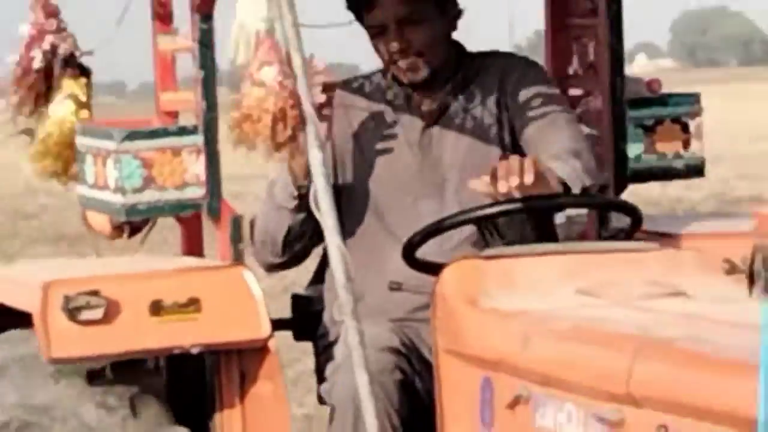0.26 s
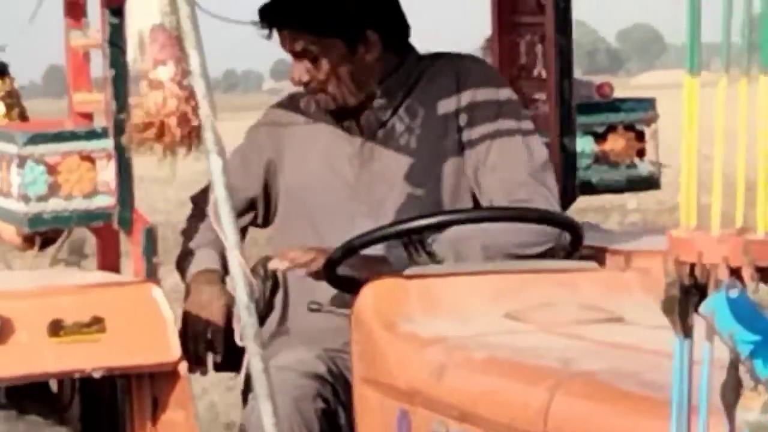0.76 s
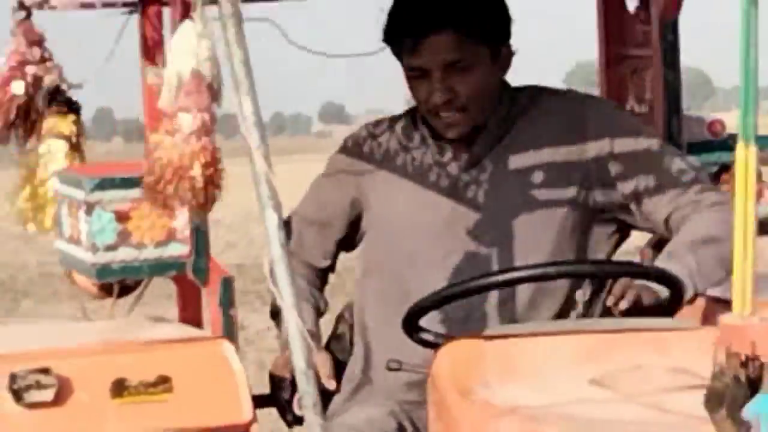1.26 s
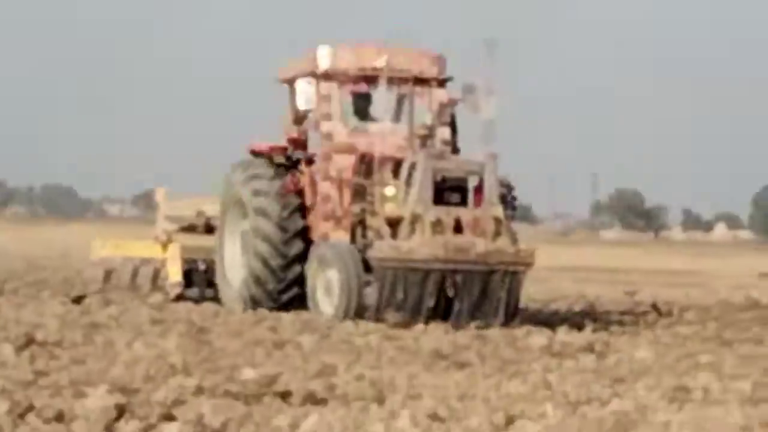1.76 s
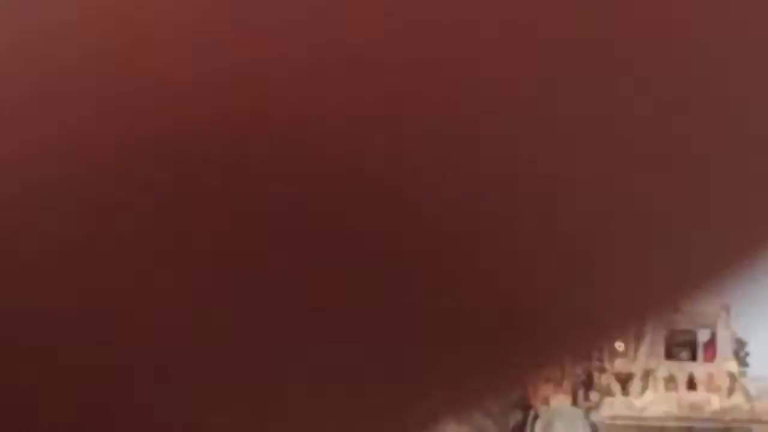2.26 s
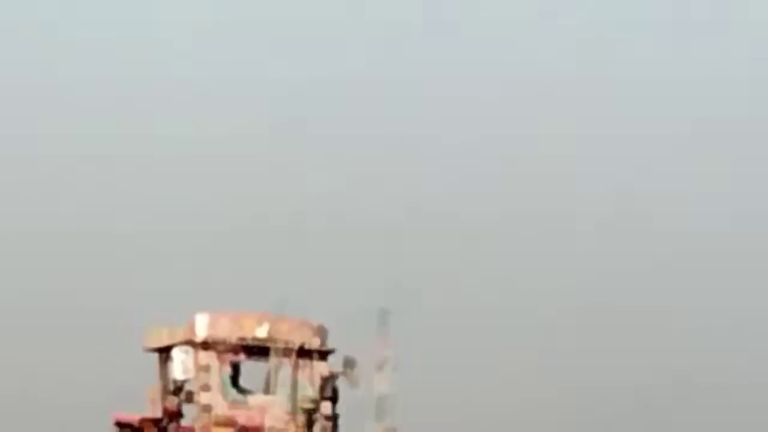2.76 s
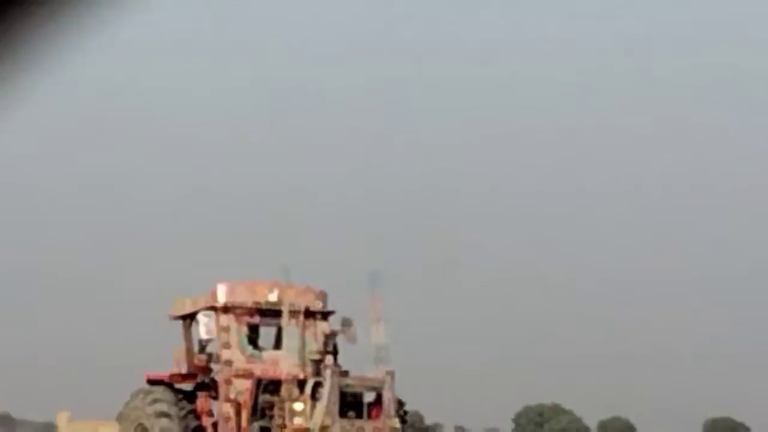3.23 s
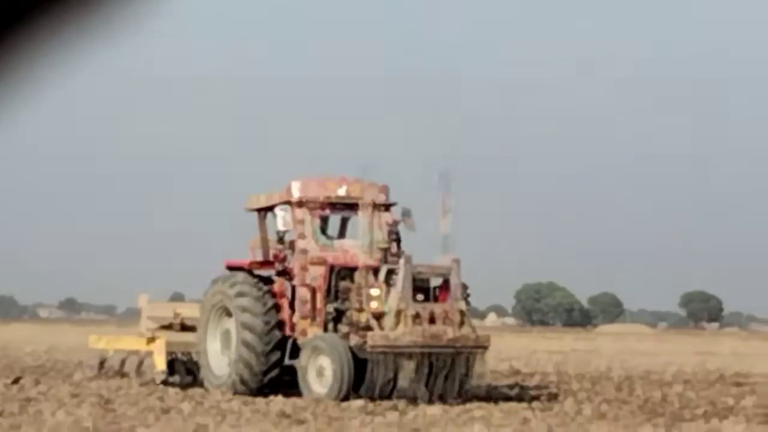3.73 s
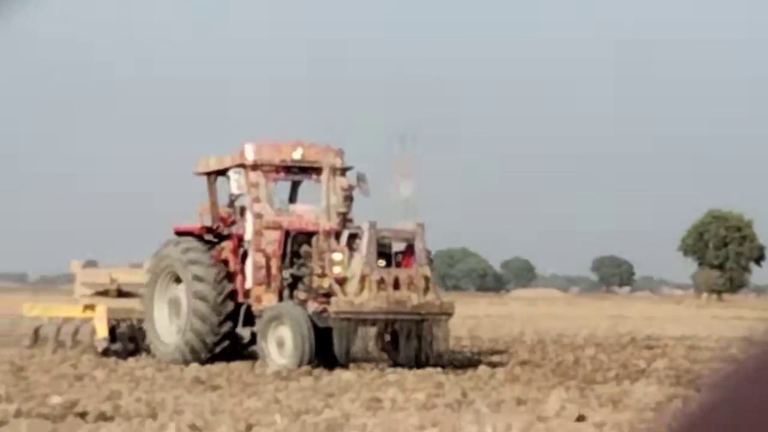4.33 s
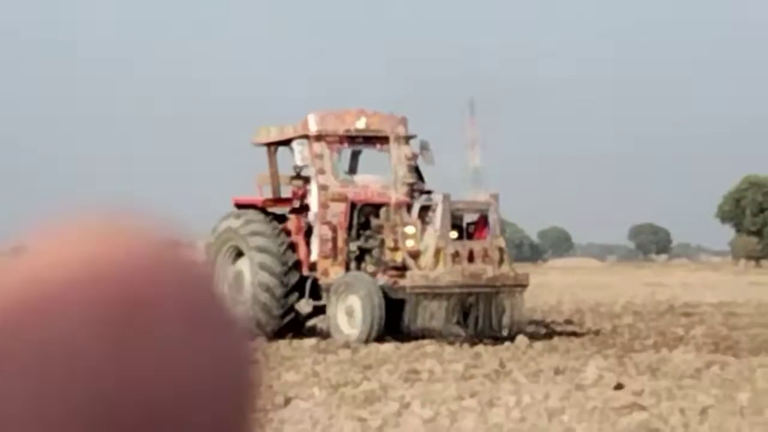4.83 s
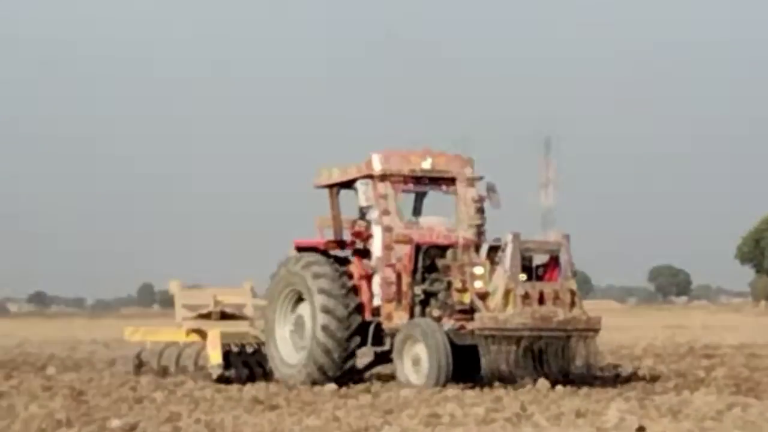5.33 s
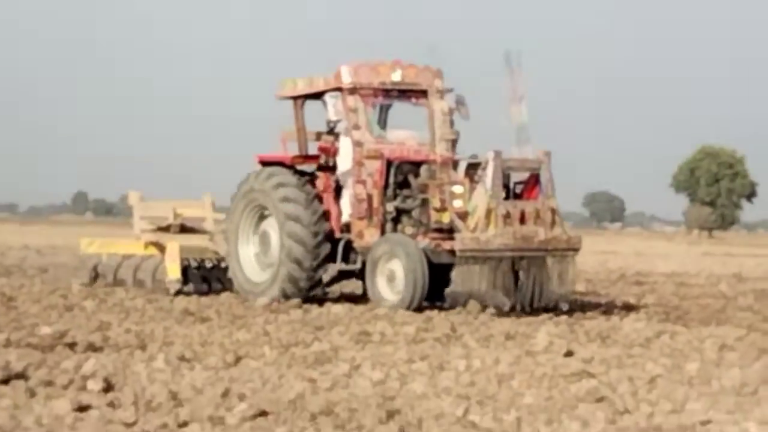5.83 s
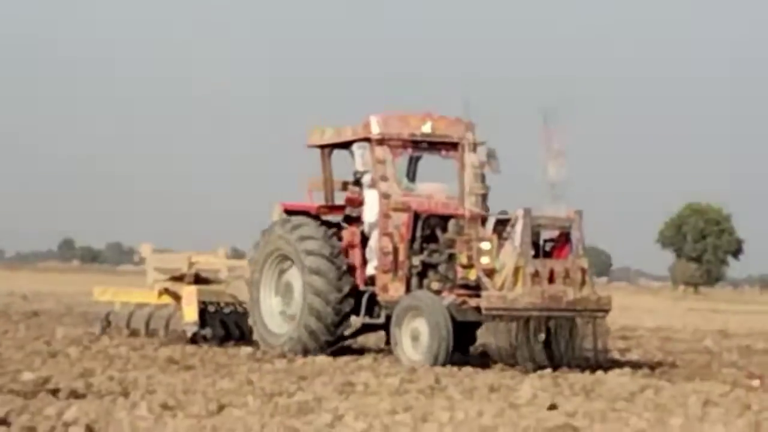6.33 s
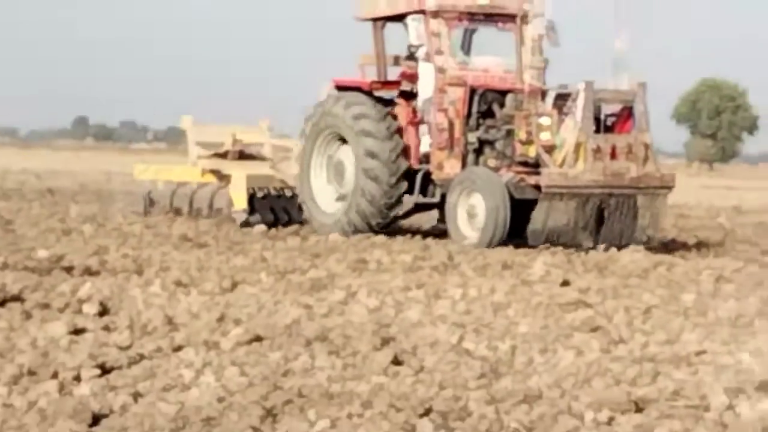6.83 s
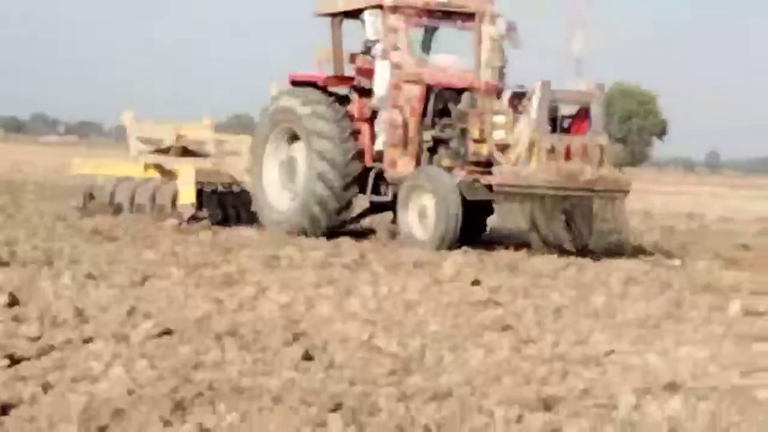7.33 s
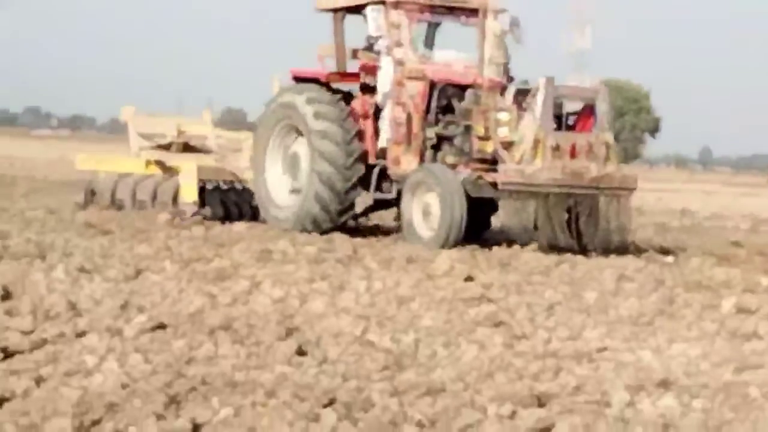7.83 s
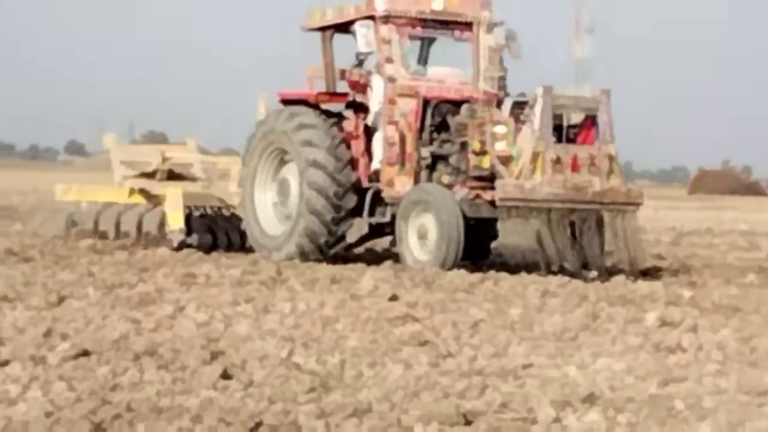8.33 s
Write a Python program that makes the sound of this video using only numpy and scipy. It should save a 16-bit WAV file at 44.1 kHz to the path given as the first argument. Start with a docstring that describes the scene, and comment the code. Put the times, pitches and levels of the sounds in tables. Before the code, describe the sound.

Very close to an old three-cylinder diesel tractor in an open field, rapid hard knocks and low exhaust thuds grow louder, with boom, ringing metal and steel scraping. Abruptly the view jumps far away: a quieter, steady low throb under blurred clatter, faint soil crumble and tiny squeaks. A finger briefly dulls the treble of the handheld microphone; later a panel buzzes, stones tick, and light wind gusts with soft bumps.

```python
"""A three-cylinder diesel tractor drags a disc harrow over dry soil. First, beside the cab, each firing thuds as
a pressure pulse in the exhaust and knocks as a noise burst through the block; it grows, rings and scrapes.
All at once it is across the field: a low throb under smeared clatter, crumbling soil and squeaks of swelling
sine. A finger dulls the treble, two faint tones having sagged before it; later the clatter turns ringing,
stones tick and a panel buzzes. Low-passed noise is the wind throughout, with a gust and bumps near the end."""
import sys
import numpy as np
from scipy import signal
from scipy.fft import rfft, irfft
from scipy.io import wavfile
from scipy.ndimage import uniform_filter1d, map_coordinates

SR = 44100
rng = np.random.default_rng(int(sys.argv[2]) if len(sys.argv) > 2 else 0)


def unload_wav(signal):
    """Save mono or channel-first audio to the path in sys.argv[1] as 16-bit WAV at rate SR, clipped to [-1, 1]."""
    wavfile.write(
        sys.argv[1],
        SR,
        np.round(np.clip(np.atleast_2d(signal).T, -1, 1) * 32767).astype(np.int16),
    )


N = 378378
T = np.arange(N) / SR  # time axis, s

# In every table, "reach" is the time from the middle of a swell to silence on either side.
# Spectra of slopes and modes set colour only: the filtered sound is scaled to rms 1 afterwards.

# Wind on the microphone, its spectrum: [f/Hz, level/dB]
WIND_SLOPE = [(10, -4), (30, 0.5), (70, -0.5), (130, 0), (200, -16.5), (500, -13.5), (2000, -70)]
# Soft bumps of the hand: [t/s, level/dB of the rustle], and the rustle's spectrum: [f/Hz, level/dB]
BUMPS = [(4.253, -44), (8.15, -42), (8.422, -32)]
BUMP_SLOPE = [(20, 32), (110, -12.5), (200, -14), (400, -1), (1500, -62)]
# Faint low tones that slide down: [middle t/s, reach/s, f/Hz at the middle, level/dB]
SAGS = [(2.699, 0.079, 378, -49.5), (2.812, 0.16, 365, -49.5)]
# Squeaks of the discs: [middle t/s, reach/s, f/Hz, level/dB]
SQUEAKS = [(1.59, .03, 6100, -32), (2.03, .045, 6030, -29), (4.96, .025, 15200, -48),
           (4.964, .02, 12500, -50), (5.03, .1, 12630, -51), (5.03, .1, 14770, -54),
           (5.04, .11, 10510, -53), (5.38, .08, 10200, -47), (5.378, .08, 9600, -49),
           (5.595, .035, 14900, -51), (5.97, .025, 8100, -42), (6.275, .025, 12350, -53),
           (7.235, .035, 8280, -44)]
# Clods breaking up on the discs: [middle t/s, reach/s, level/dB], and their spectrum: [f/Hz, level/dB]
SOIL = [(2.45, 0.23, -63), (3.15, .45, -59), (3.6, 0.23, -64), (4.8, 0.19, -54), (5.03, 0.29, -51),
        (5.4, 0.46, -51), (5.9, 0.71, -55.5), (6.28, .16, -53.5), (6.62, 0.5, -63)]
SOIL_SLOPE = [(2000, -31), (7000, -26), (12000, 6.5), (15000, 8)]
# Stones ticking on the discs: [t/s, level/dB], and their spectrum: [f/Hz, level/dB]
STONES = [(6.85, -46), (7.225, -45), (7.823, -42.5)]
STONE_SLOPE = [(3000, -30), (7500, 6), (11000, -2), (15000, -11)]
# Steel scraping through soil close by: [middle t/s, reach/s, level/dB]
SCRAPES = [(1.59, 0.078, -27.5), (1.84, 0.042, -31.5), (2.03, 0.09, -26), (2.23, 0.062, -25.5),
           (2.31, 0.14, -27.5)]
# Colour of the scrapes: slope [f/Hz, level/dB] and resonances [f/Hz, width/Hz, level/dB]
SCRAPE_SLOPE = [(300, -1.5), (1200, 1), (4000, -6), (8500, 1), (11000, -7), (15000, -23)]
SCRAPE_MODES = [(5900, 220, 6.2), (6840, 81, 4.5), (7550, 120, 8.1), (8540, 78, 5)]
# Loudest knocks of the strongest cylinder, their ring: [t/s, f/Hz, level/dB]
LOUDEST_KNOCKS = [(1.273, 2430, -17), (1.403, 2680, -17), (1.726, 2400, -17), (1.853, 2350, -11.5),
                  (1.918, 2400, -18), (1.984, 2320, -18), (2.113, 2350, -16.5), (2.307, 3720, -20),
                  (2.329, 3620, -16)]
# Gear whines: [middle t/s, reach/s, multiple of the firing rate, level/dB]
WHINES = [(3.7, 1.6, 32, -49.5), (6.5, 2.6, 19.5, -52.5)]
# Colour of the buzzing panel: slope [f/Hz, level/dB] and resonances [f/Hz, width/Hz, level/dB]
BUZZ_SLOPE = [(1000, -35), (2000, 9), (2600, 0), (4000, -40)]
BUZZ_MODES = [(2258, 45, 14), (2490, 66, 8.6)]
# Engine speed beside the cab and across the field: [t/s, firing rate/Hz]
NEAR_RATE = [(0.0, 46.53), (0.4, 46.54), (0.81, 47.03), (1.22, 46.18), (1.62, 46.44), (2.03, 46.91),
             (2.43, 45.21)]
FAR_RATE = [(2.98, 44.11), (3.03, 45.71), (3.37, 43.64), (3.99, 46.03), (4.13, 43.49), (4.6, 45.5),
            (5.01, 42.95), (5.47, 45.88), (6.03, 42.92), (6.05, 44.85), (7.05, 43.71), (7.44, 44.77),
            (8.5, 44.4)]
# Strength of each cylinder in turn, in the knock and in the exhaust: [level/dB]
KNOCK_CYLINDERS_DB = [-7, -4.5, -4]
EXHAUST_CYLINDERS_DB = [2, 1, -0.5]
# Spectrum of an exhaust thud, close and far: [f/Hz, level/dB]
NEAR_PIPE = [(10, -30), (25, -18), (46, 2), (93, 2.5), (140, -6.5), (186, -3.5), (232, -8.5), (280, -4.5),
             (350, -21), (420, -10.5), (500, -28.5), (1200, -35.5)]
FAR_PIPE = [(15, -25.5), (45, 5.5), (65, 0.5), (89, 1.5), (134, -21.5), (180, -41.5), (300, -30.5),
            (900, -44)]
# Clatter across the field: [t/s, level/dB]
FAR_CLATTER = [(2.85, -40.5), (2.98, -36.5), (3.6, -35.5), (4.1, -39.5), (4.85, -35), (5.5, -35.5),
               (5.75, -38), (6.3, -38), (6.65, -42), (7.7, -40)]
# Block and panels heard close, from the front and from the flank:
# slopes [f/Hz, level/dB] and resonances [f/Hz, width/Hz, level/dB]
NEAR_SLOPE = [(220, -4.5), (350, -6), (500, -16), (1100, -13), (1900, -12.5), (3200, -14.5), (4500, -17),
              (9000, -23), (12500, -35.5), (15000, -39.5)]
NEAR_MODES = [(392, 32, 6.8), (776, 400, 12.1), (960, 180, 3.8), (1333, 470, 7.5), (2304, 450, 8),
              (3000, 430, 2.9), (3730, 140, 3.4), (5130, 730, 8.7), (5940, 1700, 4.2), (7790, 1700, 8.3),
              (12000, 2600, 8)]
FRONT_SLOPE = [(200, -24), (480, -17), (1100, -10), (2000, -5.5), (3400, -14), (5400, -14.5), (9000, -12.5),
               (11500, -18.5), (15000, -27)]
FRONT_MODES = [(802, 32, 6.3), (1325, 230, 7.1), (1610, 64, 4.2), (2460, 210, 4.2), (2770, 430, 4.4),
               (4230, 2000, 6.1), (6930, 820, 4.9), (7600, 330, 3.5)]
FLANK_SLOPE = [(200, -32), (500, -21), (1100, -21.5), (1850, -19), (3400, -19), (7200, -24.5),
               (11500, -39.5), (15000, -45)]
FLANK_MODES = [(368, 30, 9.7), (707, 40, 4.7), (851, 37, 9.2), (1328, 96, 9.3), (1470, 410, 9.6),
               (2094, 61, 6.9), (2470, 470, 10.4), (5560, 310, 3.6), (6290, 260, 2.4), (8350, 840, 11.6),
               (9400, 580, 12.4), (10600, 680, 15)]

CUT_S = 2.43  # the listening point jumps across the field
TOP_HZ = 15450  # upper limit of the whole sound

# Wind on the microphone freshens slowly, with one gust
WIND_DB, WIND_DB_PER_S = -51.5, 0.35
GUST_S, GUST_REACH_S, GUST_DB = 8.2, 0.4, 3
SAG_HZ_PER_S = 600  # downward slide of the faint tones
TRICKLE_DB = -65.5  # steady trickle of soil under the clods

# A finger creeps over the microphone and is lifted; start and end of each move, and the loss when covered
COVER_S, UNCOVER_S = (3.35, 3.76), (4.33, 4.94)
COVER_KNOCK_DB, COVER_SOIL_DB = -7, -11

# A band of noise made from the knock sweeps upward as the tractor turns
SWEEP_S, SWEEP_REACH_S = 6.45, 1.3
SWEEP_HZ, SWEEP_HZ_PER_S, SWEEP_HALF_WIDTH_HZ, SWEEP_DB = 8160, 1700, 750, -52

# A loose panel starts to buzz and keeps on
BUZZ_START_S, BUZZ_ATTACK_S, BUZZ_DB, BUZZ_WAVER_DB = 7.08, 0.17, -47, 0.5

# Across the field: the throb grows slowly from the jump on, a little unevenly
FAR_EXHAUST_DB, FAR_EXHAUST_DB_PER_S, FAR_WAVER_DB = -37, 0.22, 1.1
SWING_S = (6.1, 6.76)  # start and end of the turn, as the side of the engine comes round
FRONT_TREBLE_DB, FLANK_TREBLE_DB = -7.5, -9.5  # offset of the clatter's treble
TREBLE_FOLLOW, TREBLE_PIVOT_DB = 0.68, -38  # treble takes this share of the level swings about the pivot

# Beside the cab: level at first, and its rise as the tractor draws level
APPROACH_S = (0.55, 1.58)  # start and end of the rise
NEAR_EXHAUST_DB, NEAR_EXHAUST_GAIN_DB = -29, 1.4
NEAR_KNOCK_DB, NEAR_KNOCK_GAIN_DB = -27, 3.5
NEAR_BOOM_DB, NEAR_BOOM_GAIN_DB = -39, 10
NEAR_HUM_HZ, NEAR_HUM_DB = 40.5, -44  # a weaker hum beats against the exhaust
BITE_S, BITE_REACH_S, BITE_DB = 2.21, 0.15, 2  # swell of the clatter as the harrow bites


def undb(db):
    """Decibels to gain."""
    return 10 ** (np.asarray(db) / 20)


def unit(x):
    """Scale to rms 1."""
    return x / np.sqrt(np.mean(x ** 2))


def curve(table):
    """A value over time, its points joined by straight lines."""
    t, value = np.transpose(table)
    return np.interp(T, t, value)


def noise():
    """White noise of rms 1."""
    return rng.standard_normal(N)


def ramp(start_s, end_s):
    """From 0 to 1 between two times."""
    return np.clip((T - start_s) / (end_s - start_s), 0, 1)


def wander(hz):
    """Slow random drift of rms 1, with hz turning points a second at most."""
    knots = np.arange(0, T[-1] + 1, 1 / hz)
    return unit(np.interp(T, knots, noise()[:len(knots)]))


def swell(middle_s, reach_s):
    """A smooth rise and fall, the fourth power of a cosine."""
    shape = np.zeros(N)
    inside = np.abs(T - middle_s) < reach_s
    shape[inside] = np.cos(np.pi / 2 * (T[inside] - middle_s) / reach_s) ** 4
    return shape


def swells(table):
    """Gain of a series of smooth swells."""
    return sum(undb(db) * swell(s, reach) for s, reach, db in table)


def band(x, hz, kind, order=4):
    """Butterworth low-pass or high-pass."""
    return signal.sosfilt(signal.butter(order, hz, kind, fs=SR, output="sos"), x)


def body(x, slope, modes=()):
    """Ring x through a causal, minimum-phase response made of a slope and resonances; rms 1."""
    size = 16384
    f = np.arange(size // 2 + 1) * SR / size
    slope_hz, slope_db = np.transpose(slope)
    db = np.interp(np.log(f + 1), np.log(slope_hz), slope_db)
    db = db + sum(peak / (1 + (2 * (f - hz) / width) ** 2) for hz, width, peak in modes)
    # keeping one side of the cepstrum makes the response causal
    cepstrum = irfft(db * np.log(10) / 20)[:size // 2]
    response = irfft(np.exp(2 * rfft(cepstrum, size)))
    return unit(signal.oaconvolve(x, response)[:N])


def ping(s, hz, decay_s):
    """One mode struck at time s: a dying sine."""
    shape = np.zeros(N)
    inside = (T > s) & (T < s + 10 * decay_s)
    age = T[inside] - s
    shape[inside] = np.sin(2 * np.pi * hz * age) * np.exp(-age / decay_s)
    return shape


def blows(table, slope, decay_s):
    """Short dying bursts of noise through one body, each at its own level."""
    rough = body(noise(), slope)
    return rough * sum(undb(db) * (T > s) * np.exp(-np.abs(T - s) / decay_s) for s, db in table)


def covered():
    """How far the finger shades the microphone, 0 to 1."""
    return ramp(*COVER_S) - ramp(*UNCOVER_S)


def microphone_rumble():
    """Light wind as low noise with one gust; each bump of the hand thumps the case and rustles."""
    wind_db = WIND_DB + WIND_DB_PER_S * T + GUST_DB * swell(GUST_S, GUST_REACH_S)
    wind = body(noise(), WIND_SLOPE) * undb(wind_db)
    # the thump is set 2 dB above the listed rustle level
    thumps = sum(undb(db + 2) * ping(s, hz=116, decay_s=0.012) for s, db in BUMPS)
    rustle = blows(BUMPS, BUMP_SLOPE, decay_s=0.02)
    return wind + thumps + rustle


def sagging_tone():
    """A faint low sine, sounding twice and sliding down each time."""
    out = np.zeros(N)
    for s, reach, hz, db in SAGS:
        cycles = np.cumsum(hz - SAG_HZ_PER_S * (T - s)) / SR
        out += np.sin(2 * np.pi * cycles) * undb(db) * swell(s, reach)
    return out


def squeaks():
    """Steel discs slip on their axles and on stones: short tones that waver a little in pitch."""
    waver = np.cumsum(unit(band(noise(), 153, "low", order=2))) / SR
    bent_time = T + 0.0041 * waver  # pitch deviates by 0.41 % rms
    out = np.zeros(N)
    for s, reach, hz, db in SQUEAKS:
        tone = np.sqrt(2) * np.sin(2 * np.pi * hz * bent_time)
        out += undb(db) * swell(s, reach) * tone
    return out


def harrow():
    """Clods crumble in dense tiny cracks, noise of uneven strength; now and then a disc meets a stone."""
    flow = (undb(TRICKLE_DB) + swells(SOIL)) * undb(COVER_SOIL_DB * covered())
    cracks = noise() * undb(3.3 * noise())
    soil = body(cracks, SOIL_SLOPE) * flow
    return soil + blows(STONES, STONE_SLOPE, decay_s=0.009)


def loudest_knocks():
    """Loudest knocks of the strongest cylinder: each rings briefly as a dying sine at its listed pitch."""
    return sum(undb(db) * ping(s, hz, decay_s=0.003) for s, hz, db in LOUDEST_KNOCKS)


def firings(rate, start):
    """Running count of firings; its fraction is the place within one firing."""
    return start + np.cumsum(curve(rate)) / SR


def strength(count, cylinders_db, scatter_db):
    """Gain of the current firing: the cylinders take turns, and no two burns are alike."""
    k = count.astype(int)
    return undb(np.array(cylinders_db)[k % len(cylinders_db)] + scatter_db * noise()[k])


def exhaust(count, pipe, scatter_db):
    """One pressure pulse a firing, shaped by pipe and silencer."""
    fires = np.diff(np.floor(count), prepend=np.floor(count[0]))
    pulses = fires * strength(count, EXHAUST_CYLINDERS_DB, scatter_db)
    thuds = body(pulses - pulses.mean(), pipe)
    return band(thuds, 1380, "low")  # the silencer holds back the treble


def knock(count, rise_s, decay_s, between, low_between, repeat, scatter_db, panel_db):
    """Each burn shakes the block in a burst; gears and valves rattle on between."""
    age = count % 1 / np.gradient(count) / SR  # seconds since the firing
    burst = (1 - np.exp(-(age / rise_s) ** 2)) * np.exp(-age / decay_s)
    burst = unit(burst * strength(count, KNOCK_CYLINDERS_DB, scatter_db))
    # the heavy block shakes much the same way in every engine cycle, and rings on between the burns
    cycle = SR // 15  # noise values laid over one engine cycle
    place = count / len(KNOCK_CYLINDERS_DB) % 1
    pattern = noise()[(place * cycle).astype(int)]
    repeat = np.clip(repeat, 0, 1)
    shaking = repeat * pattern + np.sqrt(1 - repeat ** 2) * noise()
    block = unit(shaking * np.hypot(burst, low_between))
    # the rattle is new each time, and sets the many small modes of the sheet metal ringing
    rattle = noise() * np.hypot(burst, between)
    ring = (noise() * np.exp(-T / 0.0099))[:SR // 20]
    panels = signal.fftconvolve(rattle, ring / np.linalg.norm(ring))[:N]
    rattle = unit(rattle + undb(panel_db) * panels)
    split_hz = 1600
    both = band(block, split_hz, "low", order=3) + band(rattle, split_hz, "high", order=3)
    return band(both, 134, "high", order=2)


def ground_echo(x, lag_s, sway, echo_db):
    """The ground throws back a late copy; its lag sways with the microphone, so a soft comb drifts."""
    knots = np.arange(0, T[-1] + 1, 0.5)
    drift = np.interp(T, knots, rng.standard_normal(len(knots)))
    drift = uniform_filter1d(drift, SR // 2)
    lag = lag_s * SR * np.exp(sway * drift)  # samples
    echo = map_coordinates(x, [np.arange(N) - lag], order=3)
    return x + undb(echo_db) * echo


def treble_sweep(shake):
    """The low part of the knock rides on a gliding sine: a narrow band that climbs, swells and fades."""
    hz = SWEEP_HZ + SWEEP_HZ_PER_S * (T - SWEEP_S)
    carrier = np.sin(2 * np.pi * np.cumsum(hz) / SR)
    narrow = unit(band(shake, SWEEP_HALF_WIDTH_HZ, "low", order=2) * carrier)
    return narrow * undb(SWEEP_DB) * swell(SWEEP_S, SWEEP_REACH_S)


def panel_buzz(shake):
    """The knock sets a loose panel buzzing at its own resonances."""
    level_db = BUZZ_DB + BUZZ_WAVER_DB * wander(5)
    onset = ramp(BUZZ_START_S, BUZZ_START_S + BUZZ_ATTACK_S)
    return body(shake, BUZZ_SLOPE, BUZZ_MODES) * onset * undb(level_db)


def gear_whine(count):
    """Meshing gears whine at fixed multiples of the firing rate."""
    out = np.zeros(N)
    for s, reach, multiple, db in WHINES:
        out += undb(db) * swell(s, reach) * np.sin(2 * np.pi * multiple * count)
    return out


def far_tractor():
    """Across the field: the exhaust is a soft throb, the knocks run together and their treble comes and goes."""
    flank = ramp(*SWING_S)
    exhaust_db = FAR_EXHAUST_DB + FAR_EXHAUST_DB_PER_S * (T - CUT_S) + FAR_WAVER_DB * wander(6)
    knock_db = curve(FAR_CLATTER)
    colour_db = FRONT_TREBLE_DB * (1 - flank) + FLANK_TREBLE_DB * flank + COVER_KNOCK_DB * covered()
    treble_db = TREBLE_PIVOT_DB + TREBLE_FOLLOW * (knock_db - TREBLE_PIVOT_DB) + colour_db

    count = firings(FAR_RATE, start=0.45)
    throb = exhaust(count + 0.05, FAR_PIPE, scatter_db=1.0)
    hum = np.sin(2 * np.pi * 2.14 * count)  # a weaker hum beats against the second harmonic
    low_end = (throb + undb(-10.5) * hum) * undb(exhaust_db)

    shake = knock(count, rise_s=0.0037, decay_s=0.0077, between=1.4, low_between=2.7,
                  repeat=0.61, scatter_db=1.6, panel_db=-15)
    shake = ground_echo(shake, lag_s=0.001112, sway=0.14, echo_db=-13.5)
    turn = np.pi / 2 * flank
    front = np.cos(turn) ** 2 * body(shake, FRONT_SLOPE, FRONT_MODES)
    side = np.sin(turn) ** 2 * body(shake, FLANK_SLOPE, FLANK_MODES)
    clatter = front + side
    # bass and treble of the clatter follow separate levels
    low = signal.sosfiltfilt(signal.butter(4, 3700, fs=SR, output="sos"), clatter)
    clatter = unit(low) * undb(knock_db) + unit(clatter - low) * undb(treble_db)
    clatter = band(clatter, 10460, "low")
    return low_end + clatter + treble_sweep(shake) + panel_buzz(shake) + gear_whine(count)


def near_tractor():
    """Beside the cab: hard separate knocks just after each thud, a booming cab, and scrapes from the harrow."""
    closeness = ramp(*APPROACH_S)
    bite_db = BITE_DB * swell(BITE_S, BITE_REACH_S)
    exhaust_db = NEAR_EXHAUST_DB + NEAR_EXHAUST_GAIN_DB * closeness
    knock_db = NEAR_KNOCK_DB + NEAR_KNOCK_GAIN_DB * closeness + bite_db
    boom_db = NEAR_BOOM_DB + NEAR_BOOM_GAIN_DB * closeness + 2 * bite_db  # the boom swells twice as much

    count = firings(NEAR_RATE, start=2.72)
    thud = exhaust(count + 0.0086, NEAR_PIPE, scatter_db=1.36)
    boom = np.cos(2 * np.pi * 3 * (count + 0.015))  # the cab resonates with the third harmonic
    hum = np.sin(2 * np.pi * NEAR_HUM_HZ * T) * undb(NEAR_HUM_DB)
    shake = knock(count, rise_s=0.0023, decay_s=0.0039, between=0.82, low_between=1.32,
                  repeat=0.7, scatter_db=0.3, panel_db=-13)
    clatter = body(shake, NEAR_SLOPE, NEAR_MODES)
    scrape = body(noise(), SCRAPE_SLOPE, SCRAPE_MODES) * swells(SCRAPES)
    return thud * undb(exhaust_db) + hum + boom * undb(boom_db) + clatter * undb(knock_db) + scrape


def scene():
    """The listening point jumps from beside the cab to across the field; squeaks and wind run through."""
    near = near_tractor() + loudest_knocks()
    far = far_tractor() + harrow() + sagging_tone()
    away = ramp(CUT_S - 0.002, CUT_S)
    tractor = (1 - away) * near + away * far
    return (tractor + squeaks() + microphone_rumble())[None]


def record(dry):
    """A steep elliptic low-pass cuts the top."""
    return signal.sosfilt(signal.ellip(10, 0.2, 80, TOP_HZ, fs=SR, output="sos"), dry)


dry = scene()
out = record(dry)
unload_wav(out)
```